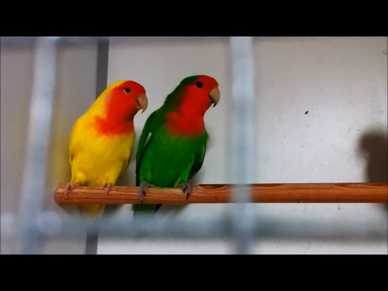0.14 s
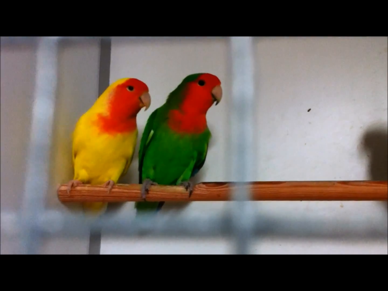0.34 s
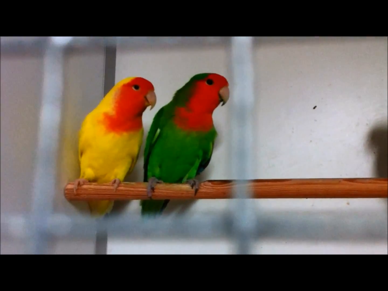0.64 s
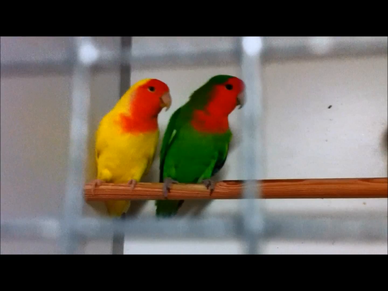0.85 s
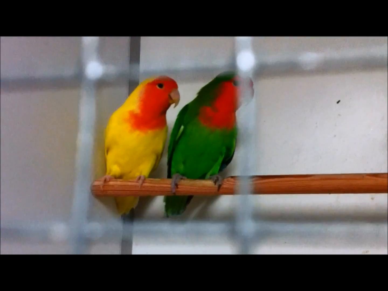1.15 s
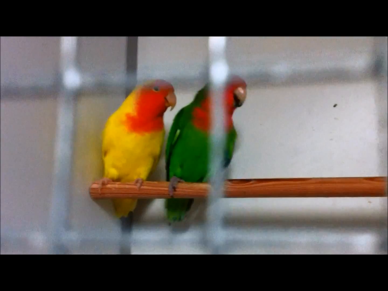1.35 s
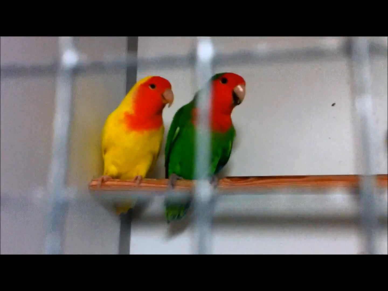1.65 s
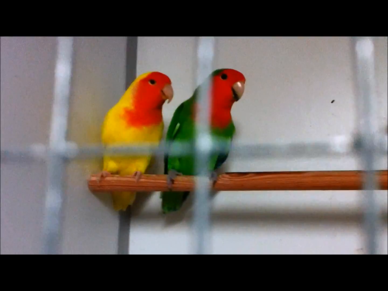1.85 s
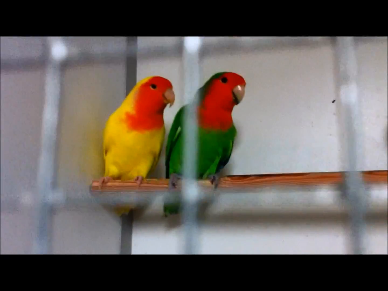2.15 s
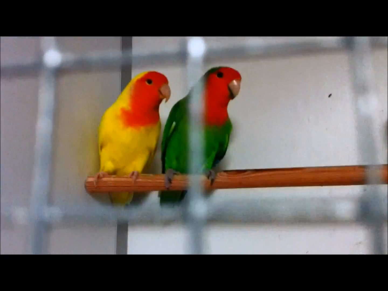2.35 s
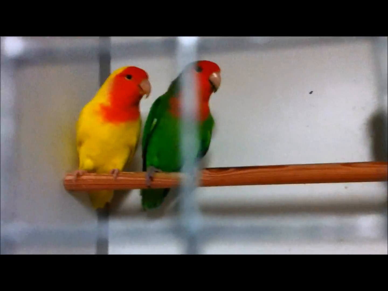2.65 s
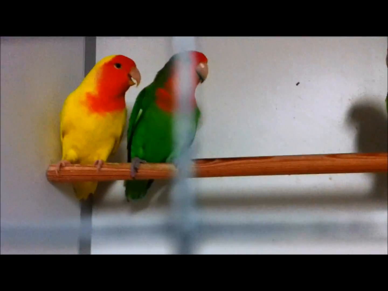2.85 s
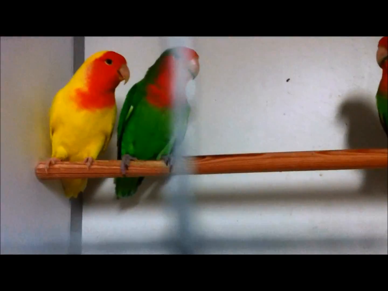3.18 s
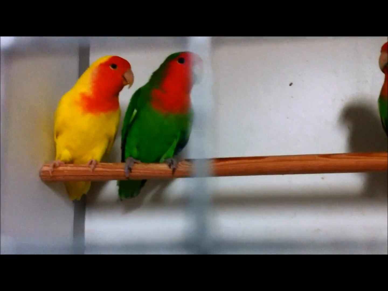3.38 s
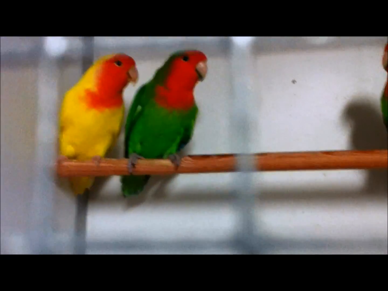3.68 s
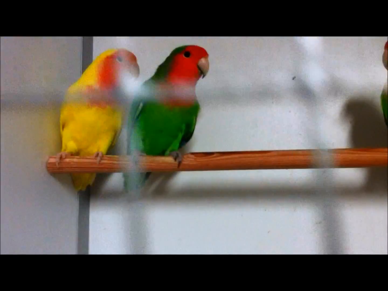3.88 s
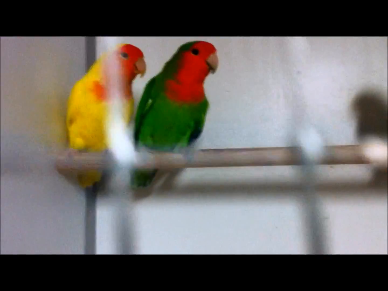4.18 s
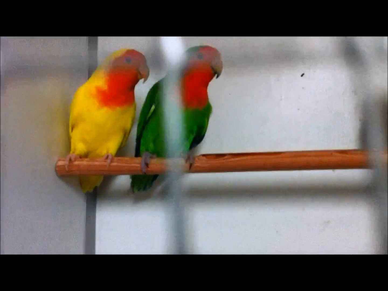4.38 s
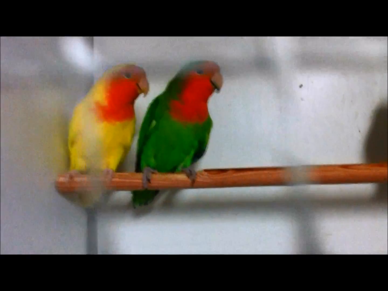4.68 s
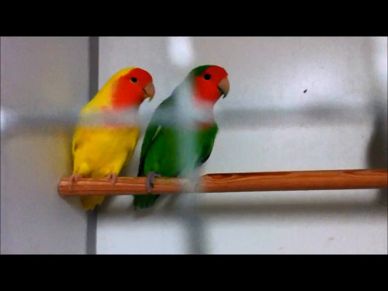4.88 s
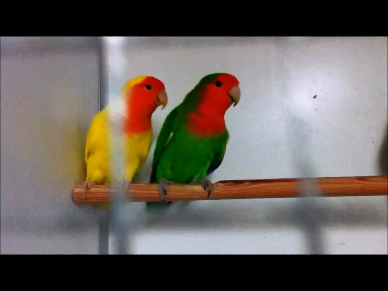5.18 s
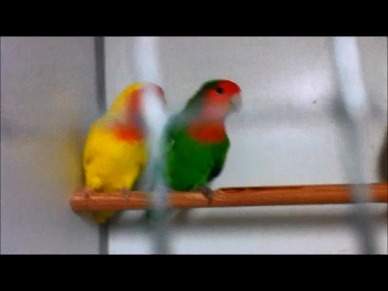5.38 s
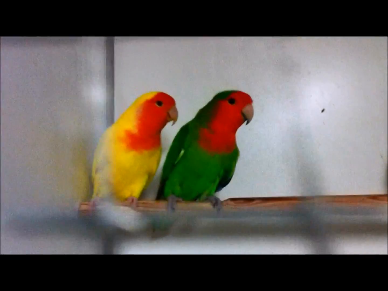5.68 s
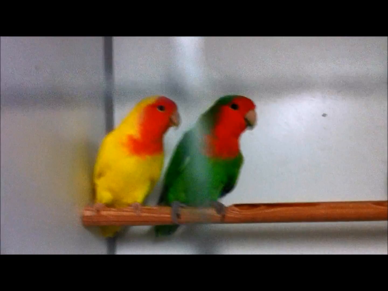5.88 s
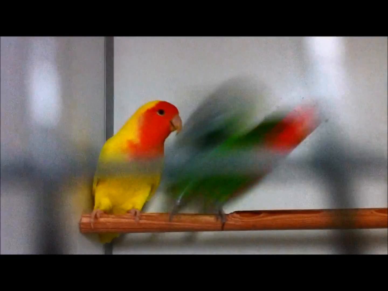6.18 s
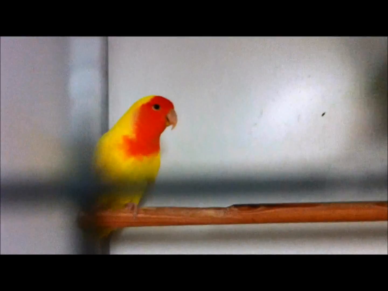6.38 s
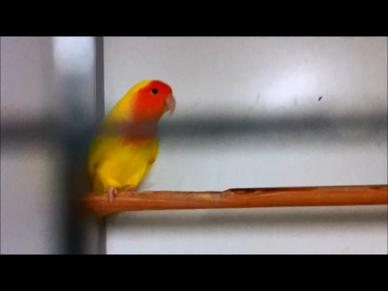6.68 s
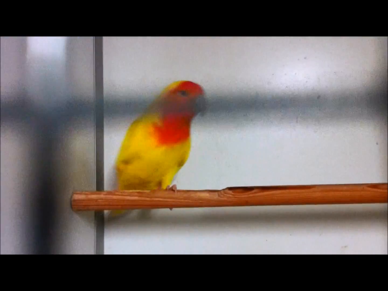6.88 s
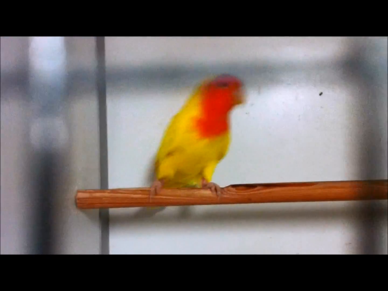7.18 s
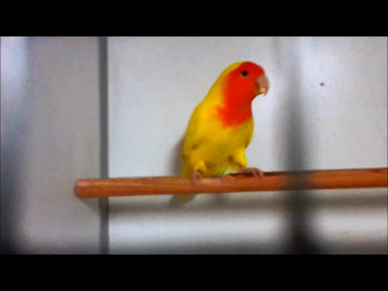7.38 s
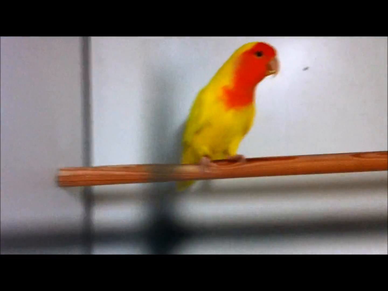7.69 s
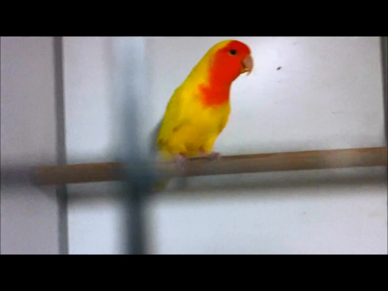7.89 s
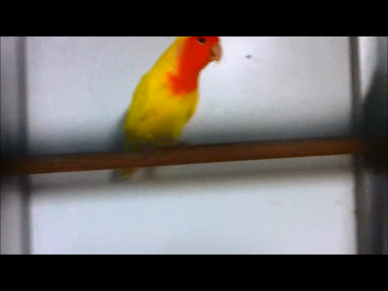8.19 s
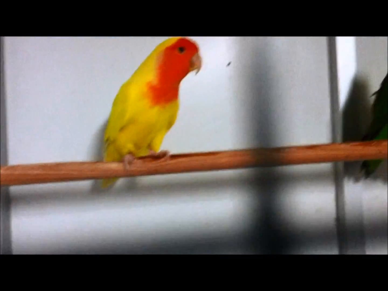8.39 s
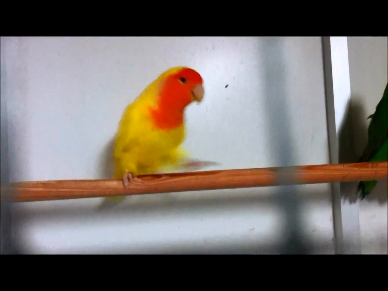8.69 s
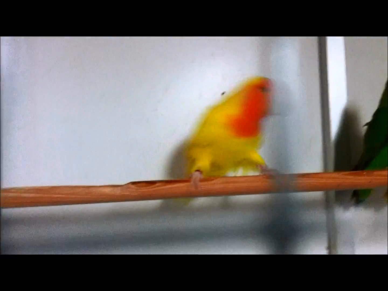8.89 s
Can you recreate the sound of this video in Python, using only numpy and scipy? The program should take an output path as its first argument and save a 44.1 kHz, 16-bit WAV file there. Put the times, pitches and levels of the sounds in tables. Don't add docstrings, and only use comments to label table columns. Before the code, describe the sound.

Several small parrots in an indoor cage. It opens with soft feather rustle and a single chip, then a run of harsh trilled screeches and shrill whistles. Softer, more distant notes follow, then piercing squeals, a quick chatter of chips with wing flaps and thumps, and one hoarse sagging squawk before spaced chips and a final sharp whistle. Close microphone, short bright room echo, faint ventilation.

```python
import sys
import numpy as np
from scipy import signal
from scipy.fft import rfft, irfft, next_fast_len
from scipy.io import wavfile
from scipy.ndimage import uniform_filter1d, minimum_filter1d

SR = 44100
rng = np.random.default_rng(int(sys.argv[2]) if len(sys.argv) > 2 else 0)


def invert_db(x):
    u = np.asarray(x, float) / 20
    return 10 ** u


def wav_record(signal):
    frames = np.transpose(np.atleast_2d(signal))
    bounded = np.clip(frames, -1, 1)
    quanta = np.round(bounded * 32767).astype(np.int16)
    wavfile.write(sys.argv[1], SR, quanta)


N = 398663


def at_hz(points, hz):
    points = np.array(points)
    return np.interp(np.log(hz), np.log(points[:, 0]), points[:, 1])


def rms_one(x):
    return x / np.sqrt(np.mean(x ** 2) + 1e-20)


def drift(rate_hz, size):
    r = np.exp(-2 * np.pi * rate_hz / SR)
    slow = signal.lfilter([1], [1, -2 * r, r * r], rng.standard_normal(size + 8000))[8000:]
    return slow / np.sqrt((1 + r * r) / (1 - r * r) ** 3)


def band_pass(x, low_hz, high_hz):
    return signal.sosfilt(signal.butter(2, [low_hz, high_hz], "band", fs=SR, output="sos"), x)


def coloured(spectrum, patchy_db):
    out, white = 0, rng.standard_normal((2, N))
    low_hz, top_hz = spectrum[0][0], spectrum[-1][0]
    edges = np.geomspace(low_hz, top_hz, round(2 * np.log2(top_hz / low_hz)))
    for k, (low, high) in enumerate(zip(edges, edges[1:])):
        band = band_pass(white[k % 2], low, high)
        flicker = np.repeat(drift(400, N // 40 + 1), 40)[:N]
        out = out + invert_db(at_hz(spectrum, np.sqrt(low * high)) + patchy_db * flicker) * band
    return rms_one(out)


def room(x):
    # (frequency [Hz], t60 [s])
    decay_times = [(1000, 0.34), (2000, 0.26), (4000, 0.25), (8000, 0.19), (14000, 0.17)]
    first_wall_s = 0.0013
    t = np.arange(round(.6 * SR)) / SR
    sparse = rng.random(len(t)) < .02 + t / .04
    density = np.clip(0.0067 + t / 0.036, 0, 1)
    walls = rng.standard_normal(len(t)) * sparse / np.sqrt(density) * (t > first_wall_s)
    edges, tail = 350 * 2 ** np.arange(0, 6, .7), 0
    for low, high in zip(edges, edges[1:]):
        t60 = at_hz(decay_times, np.sqrt(low * high))
        tail = tail + band_pass(walls, low, high) * invert_db(-60 * t / t60)
    return signal.fftconvolve(x, tail / np.sqrt(np.sum(tail ** 2)))[:N]


def drone():
    # (frequency [Hz], bandwidth [Hz], level [dB])
    fan_modes = [(195, 20, -69), (100, 15, -82.5)]
    out = invert_db(-80) * rng.standard_normal(N)
    for hz, width_hz, level_db in fan_modes:
        r = np.exp(-np.pi * width_hz / SR)
        poles = [1, -2 * r * np.cos(2 * np.pi * hz / SR), r * r]
        out += invert_db(level_db) * rms_one(signal.lfilter([1, 0, -1], poles, rng.standard_normal(N)))
    return out


def rustle():
    # (frequency [Hz], spectral density [dB per Hz])
    wing_spectrum = [(88, -32.5), (165, -2.5), (404, -2.5), (439, -0.5), (735, -5), (928, -10.5),
                     (1400, -9), (1820, -42), (3080, -120)]
    # (frequency [Hz], spectral density [dB per Hz])
    feather_spectrum = [(530, -23.5), (900, -21.5), (1420, -5.5), (2510, -8), (4060, -7.5), (6060, -12),
                        (8040, -12), (15000, -17)]
    # (time [s], level [dB])
    bustle = [(0, -58), (.33, -68), (.68, -65), (.76, -51), (1.5, -53), (1.56, -66), (2.3, -61), (2.6, -56),
              (3.2, -63), (3.4, -52), (3.95, -49), (4.4, -53), (4.9, -62), (5.3, -56), (6.15, -59),
              (6.8, -57), (8.05, -60.5), (9.04, -60)]
    # (time [s], half length [s], level [dB], feather hiss relative to it [dB])
    flutters = [(1.11, .04, -53, -5), (1.21, .06, -49, -5), (1.51, .04, -55, -3), (1.65, .04, -55, -18),
                (1.8, .05, -57, -3), (2.68, .08, -52, -12), (2.84, .035, -45, -6), (2.97, .06, -47, -16),
                (3.1, .06, -49, -18), (3.23, .05, -44, -20), (3.37, .05, -49, -10), (3.6, .1, -60, 3),
                (5.59, .06, -46, -20), (5.85, .12, -54, -2), (6.52, .08, -41, -16), (6.675, .04, -35, -12),
                (7.62, .08, -58, -5), (7.78, .09, -54, -6), (8.4, .07, -62, -2), (8.87, .08, -56, -10),
                (5.2, .15, -62, -6), (6.33, .15, -49, -17), (8.6, .2, -51, -13), (4.15, .12, -66, 0)]
    # (time [s], level [dB])
    draught = [(0.0, -82), (1.26, -68), (1.56, -76), (4.33, -63), (4.51, -76), (5.54, -68), (5.97, -78),
               (6.7, -59), (6.77, -79), (7.53, -69), (8.31, -81), (8.58, -64), (8.99, -73), (9.04, -64)]
    t = np.arange(N) / SR
    low_gain = invert_db(np.interp(t, *np.transpose(bustle)))
    hiss_gain = invert_db(-13.5) * low_gain
    for s, half, level_db, hiss_db in flutters:
        swell = np.clip(1 - np.abs(t - s) / half, 0, 1) ** 2
        low_gain = low_gain + invert_db(level_db) * swell
        hiss_gain = hiss_gain + invert_db(level_db + hiss_db) * swell
    wings = invert_db(-1.7) * low_gain * coloured(wing_spectrum, patchy_db=2.5)
    air = rms_one(band_pass(rng.standard_normal(N), 60, 130))
    air = invert_db(np.interp(t, *np.transpose(draught)) + 1.5) * air
    feathers = invert_db(9.5) * hiss_gain * coloured(feather_spectrum, patchy_db=3.7)
    return wings + air + feathers


def thumps():
    # (time [s], peak level [dB], t60 [s])
    beats = [(1.199, -36.5, 0.014), (2.297, -26.5, 0.011), (2.469, -40.5, 0.051), (2.927, -39, 0.022),
             (3.214, -42, 0.026), (6.489, -26, 0.012), (6.524, -32, 0.02), (6.666, -33.5, 0.014),
             (6.709, -27, 0.02), (8.744, -47, 0.024)]
    out, t = np.zeros(N), np.arange(round(.1 * SR)) / SR
    for s, level_db, t60 in beats:
        puff = band_pass(rng.standard_normal(len(t)) * invert_db(-60 * t / t60), 90, 800)
        first = round(s * SR)
        out[first:first + len(t)] += invert_db(level_db) * puff / np.abs(puff).max()
    return out


def note_clock():
    return np.arange(round(.2 * SR)) / SR


def sing(out, s, length, level_db, pitch, swell, throat, tilt_db=0, odd_db=0, half_db=-90, breath=0,
         rise=0.00067, fall=.004):
    t = np.arange(len(pitch)) / SR
    phase = 2 * np.pi * np.cumsum(pitch) / SR
    partials = np.arange(1, 19) / 2 if half_db > -60 else np.arange(1, 10)
    note = 0
    for k in partials:
        hz = np.minimum(k * pitch, .45 * SR)
        kind_db = half_db if k % 1 else odd_db * (k % 2) * (.4 if k == 1 else 1)
        gain = invert_db(at_hz(throat, hz) + tilt_db * np.log2(hz / 4500) + kind_db)
        note = note + gain * (hz < .45 * SR) * np.sin(k * phase + k * k)
    note = note * swell * (1 + breath * drift(1000, len(t)))
    attack = np.clip(t / rise, 0, 1)
    release = np.clip((length + fall - t) / (2 * fall), 0, 1) ** 2
    first = round(s * SR)
    out[first:first + len(t)] += (invert_db(level_db) * attack * release * rms_one(note))[:N - first]


def above(x, hz):
    return signal.sosfilt(signal.butter(8, hz, "high", fs=SR, output="sos"), x + 1e-18)


def through(x, beak):
    size = next_fast_len(N)
    hz = np.arange(size // 2 + 1) * SR / size + 1
    return irfft(rfft(x, size) * invert_db(at_hz(beak, hz)), size)[:N]


def chips():
    # (time [s], pitch [Hz], level [dB], half-pitch partials [dB])
    chip_rows = [(1.075, 2075, -24.5, -16), (2.223, 2400, -34.5, -9), (5.457, 1935, -24, -14),
                 (5.556, 1890, -23, -15), (5.651, 1955, -26, -16), (5.752, 2044, -24, -20),
                 (5.858, 1885, -26, -33), (6.033, 2238, -19.5, -14), (6.114, 2060, -16.5, -8),
                 (6.203, 2124, -22, -13), (6.287, 2209, -17, -29), (6.371, 2636, -14.5, -26),
                 (6.455, 2312, -27.5, -21), (6.536, 2420, -29.5, -19), (6.612, 2260, -25.5, -31.5),
                 (6.691, 2580, -33, -4.5), (7.294, 2420, -51.5, -3), (7.386, 2250, -29, 0),
                 (7.721, 2293, -27, -5), (7.808, 2394, -26, -9), (7.89, 2206, -27, -6),
                 (7.976, 2300, -26.5, -2.5)]
    # (frequency [Hz], level [dB])
    chip_throat = [(900, -17.5), (1500, -18), (2300, -3.5), (3600, 3.5), (5500, 6.8), (8000, 1.5),
                   (11000, -3), (13000, -17.5), (17000, -28.5)]
    out = np.zeros(N)
    for s, hz, level_db, half_db in chip_rows:
        louder = np.clip(level_db + 24, -12, 12)
        length = .0112 - .0002 * louder
        tilt_db = -2.2 + .3 * louder + 3 * (hz - 2200) / 1000
        t = note_clock()
        pitch = hz * np.exp((.032 + .09 * np.exp(-t / .002)) * drift(700, len(t)))
        swell = invert_db(2.1 * drift(300, len(t)))
        sing(out, s, length, level_db, pitch, swell, chip_throat, tilt_db, 0.5, half_db, breath=.3,
             rise=0.0013, fall=0.0073)
    return above(out, 690)


def whistles(rows, waver, breath, scoop, tilt_db=0):
    # (frequency [Hz], level [dB])
    whistle_throat = [(900, -44.5), (1500, -9.5), (2300, -15), (3300, 9), (4700, -7.1), (6200, 2.5),
                      (8000, -13.5), (10500, -17), (13000, -15), (17000, -44)]
    out, last_end = np.zeros(N), 0
    for s, length, first_hz, last_hz, level_db, odd_db in rows:
        t = note_clock()
        progress = np.clip(t / length, 0, 1)
        pitch = first_hz + (last_hz - first_hz) * np.sin(np.pi / 2 * progress)
        fresh = s - last_end > .004
        unsteady = waver * drift(380, len(t)) + .006 * drift(27, len(t))
        pitch = pitch * np.exp(-fresh * scoop * np.exp(-t / 0.0035) + unsteady)
        swell = invert_db(2.9 * drift(120, len(t)))
        swell = swell * invert_db(-fresh * 9 * (1 - progress))
        sing(out, s, length, level_db, pitch, swell, whistle_throat, tilt_db, odd_db, half_db=-48,
             breath=breath, rise=.001 + fresh * .12 * length, fall=.002)
        last_end = s + length
    return above(out, 1550)


def far_whistles():
    # (time [s], length [s], first pitch [Hz], last pitch [Hz], level [dB])
    far_rows = [(1.5, 0.0033, 4900, 6100, -3.5), (3.365, 0.024, 2412, 2450, -15),
                (3.387, 0.02, 2637, 2650, -16.5), (3.538, 0.013, 2000, 2400, -18),
                (3.549, 0.023, 2603, 2650, -14.5), (3.74, 0.041, 2485, 2680, -16),
                (3.895, 0.021, 2533, 2692, -20.5)]
    odd_db = -4
    return whistles([(*row, odd_db) for row in far_rows], waver=.025, breath=0.15, scoop=0.04, tilt_db=-2)


def near_whistles():
    # (time [s], length [s], first pitch [Hz], last pitch [Hz], level [dB])
    full_rows = [(1.593, 0.067, 2115, 2286, -13.5), (1.746, 0.05, 2140, 2362, -9),
                 (4.404, 0.013, 1820, 1968, -11.5), (4.493, 0.019, 1850, 2220, -14.5),
                 (4.585, 0.025, 2150, 2360, -15), (4.733, 0.026, 2412, 2530, -3),
                 (4.831, 0.034, 3705, 3790, -11.5), (5.789, .008, 5480, 5760, -14),
                 (6.702, 0.022, 2126, 2180, -5), (6.836, 0.033, 2134, 2313, -8.5),
                 (8.952, 0.0075, 4950, 5320, -3.5)]
    # (time [s], length [s], first pitch [Hz], last pitch [Hz], level [dB])
    pure_rows = [(4.77, 0.0073, 3000, 2430, -11), (4.778, 0.043, 4050, 4066, -12),
                 (4.866, .02, 3880, 3980, -7), (5.798, 0.0041, 5620, 6580, -23),
                 (6.728, 0.017, 5890, 6560, -12), (6.872, 0.029, 6420, 6480, -10),
                 (8.957, .004, 5100, 4740, -9.5), (8.963, 0.044, 5930, 6450, -13),
                 (8.998, 0.054, 6264, 6206, -9)]
    # (time [s], length [s], first pitch [Hz], last pitch [Hz], level [dB])
    shrill_rows = [(1.466, 0.042, 3880, 4330, -8.5), (4.414, .014, 4190, 4220, -4),
                   (4.428, 0.012, 4300, 4810, -6.5), (4.505, 0.016, 4250, 4510, -13),
                   (4.595, .03, 5060, 4595, -11), (4.753, .005, 2550, 3080, -7),
                   (4.758, 0.022, 3112, 3100, -9), (4.8, 0.011, 2800, 3140, -12),
                   (4.817, 0.0092, 3150, 2900, -13.5), (5.8, 0.049, 2650, 3220, -35),
                   (5.92, 0.012, 4600, 5170, -17), (5.982, 0.014, 4500, 4660, -24)]
    kinds = [(full_rows, -5.5), (pure_rows, 1.2), (shrill_rows, -19)]
    rows = sorted((*row, odd_db) for kind, odd_db in kinds for row in kind)
    return whistles(rows, waver=.009, breath=.05, scoop=.11)


def screeches(rows, trill_hz, beak, sweep, chaos, breath, low_hz, sag, fade_db):
    # (frequency [Hz], level [dB])
    even_throat = [(100, 0), (20000, 0)]
    out = np.zeros(N)
    for s, length, hz, level_db, tilt_db in rows:
        t = note_clock()
        progress = np.clip(t / length, 0, 1)
        turn = 2 * np.pi * np.cumsum(trill_hz * (1 + .05 * drift(60, len(t)))) / SR
        unrest = np.clip(t / .012, .2, 1)
        trill = np.sin(turn) - 0.99 * np.cos(2 * turn) + .4
        bend = unrest * (sweep * trill + chaos * drift(360, len(t)))
        pitch = hz * np.exp(bend + .02 * drift(25, len(t)))
        pitch = pitch * np.exp(-sag * np.sin(np.pi * progress))
        swell = invert_db(2.0 * np.cos(turn + .5) + 1.8 * drift(200, len(t)) + 1.5 * drift(30, len(t)))
        swell = swell * invert_db(-fade_db * progress ** 3)
        sing(out, s, length, level_db + 4, pitch, swell, even_throat, tilt_db, breath=breath,
             rise=.0025, fall=.006)
    return above(through(out, beak), low_hz)


def harsh_calls():
    # (time [s], length [s], pitch [Hz], level [dB], tilt [dB per octave])
    screech_rows = [(1.301, 0.088, 2515, -9, 2.76), (1.61, 0.07, 2311, -16.5, 1.3),
                    (1.799, 0.0082, 2640, -13.5, -2.6), (1.953, 0.099, 2423, -14, 1.8),
                    (2.245, 0.083, 2344, -12.5, 2.24), (2.515, 0.083, 2610, -24.5, -2.9),
                    (2.818, 0.1, 2480, -13, 0.4), (3.238, 0.14, 2405, -16, -0.5),
                    (4.5, 0.097, 2406, -19, -2.2), (8.951, 0.013, 4446, -27.5, -2),
                    (4.723, 0.014, 2410, -18, -5.3), (4.81, 0.041, 2900, -12, 33.2)]
    # (time [s], pitch [Hz], level [dB], tilt [dB per octave])
    rasp_rows = [(6.7, 2234, -5.5, 2.3), (6.858, 2670, -11.5, 3.5), (5.849, 2720, -13, 9),
                 (5.913, 2530, -12, 8), (6.047, 2180, -27, -11), (5.94, 2370, -20.5, 0),
                 (5.977, 2470, -23, 0), (6.125, 2890, -27, 2.5)]
    # (time [s], length [s], pitch [Hz], level [dB], tilt [dB per octave])
    hoarse_rows = [(6.708, .035, 2230, -15, 3), (6.838, .03, 2300, -20, 1), (3.539, .018, 2500, -23, 3),
                   (3.742, .018, 2600, -28, 0)]
    # (time [s], length [s], pitch [Hz], level [dB], tilt [dB per octave])
    deep_rows = [
        (2.935, 0.1155, 1840, -11.5, -1),
        (3.043, 0.046, 1995, -11.5, 1.5),
    ]
    # (time [s], length [s], pitch [Hz], level [dB], tilt [dB per octave])
    squawk_rows = [
        (7.467, 0.15, 1947, -17.5, 0.16),
    ]
    # (frequency [Hz], level [dB])
    open_beak = [(1500, -32), (2100, -24.5), (2600, -11), (3500, 5.5), (4800, -0.1), (6000, 3.5),
                 (7800, -9.5), (10000, -7.5), (12500, -16), (17000, -48.5)]
    # (frequency [Hz], level [dB])
    deep_beak = [(1200, -20), (1900, -6), (2650, -15.5), (3300, -4), (4500, -3), (5600, 1.2), (8000, -9.5),
                 (10000, -8.5), (12500, -14.5), (17000, -40.5)]
    # (frequency [Hz], level [dB])
    squawk_beak = [(1200, -14), (2000, -8), (2700, -2), (3300, 0), (4200, 7.8), (5000, -4), (6000, 6.5),
                   (8000, -6.5), (10500, -8), (17000, -35)]
    trill_hz, squawk_trill_hz, rasp_s = 170, 157, .0115
    rasps = [(s, rasp_s, hz, level_db, tilt_db) for s, hz, level_db, tilt_db in rasp_rows]
    out = screeches(screech_rows + rasps, trill_hz, open_beak, sweep=.13, chaos=.055, breath=.18,
                    low_hz=2200, sag=.03, fade_db=6)
    out = out + screeches(deep_rows, trill_hz, deep_beak, sweep=.15, chaos=.025, breath=.09,
                          low_hz=1300, sag=.05, fade_db=1.5)
    out = out + screeches(squawk_rows, squawk_trill_hz, squawk_beak, sweep=.11, chaos=.02, breath=.06,
                          low_hz=1250, sag=.17, fade_db=0)
    return out + screeches(hoarse_rows, trill_hz, open_beak, sweep=.1, chaos=.06, breath=.2,
                           low_hz=2000, sag=0, fade_db=3)


def scene():
    harsh = harsh_calls()
    near = near_whistles()
    far = far_whistles()
    distant = chips()
    wet = room(invert_db(-3) * harsh + invert_db(-9) * near + invert_db(1) * far + invert_db(2.5) * distant)
    dry = harsh + near + far + distant + wet + rustle() + thumps() + drone()
    return dry[None]


def band_limit(x):
    return signal.sosfilt(signal.butter(12, 15810, fs=SR, output="sos"), x)


def record(dry):
    x = signal.sosfilt(signal.butter(2, 55.7, "high", fs=SR, output="sos"), dry)
    peak_gain = minimum_filter1d(np.minimum(1, .97 / (np.abs(x) + 1e-9)), size=161, axis=1)
    x = x * uniform_filter1d(peak_gain, size=81, axis=1)
    x = signal.sosfilt(signal.cheby2(12, 60, 15950, fs=SR, output="sos"), x)
    return band_limit(x)


dry = scene()
out = record(dry)
wav_record(out)
```